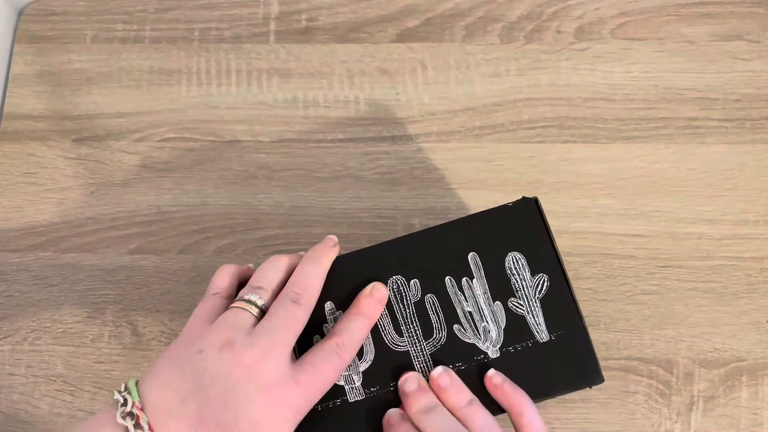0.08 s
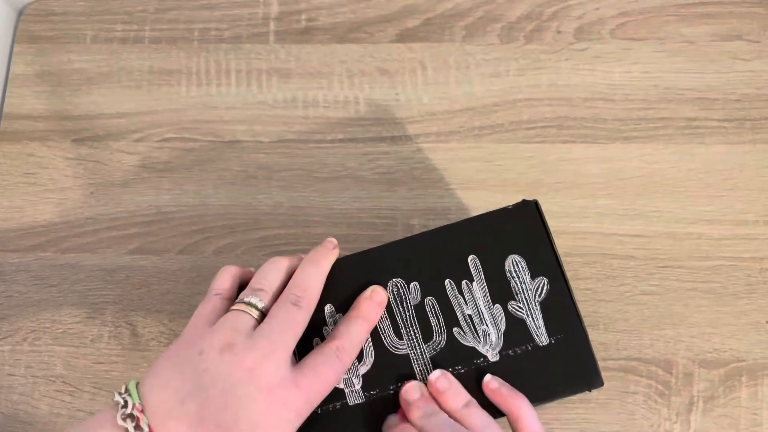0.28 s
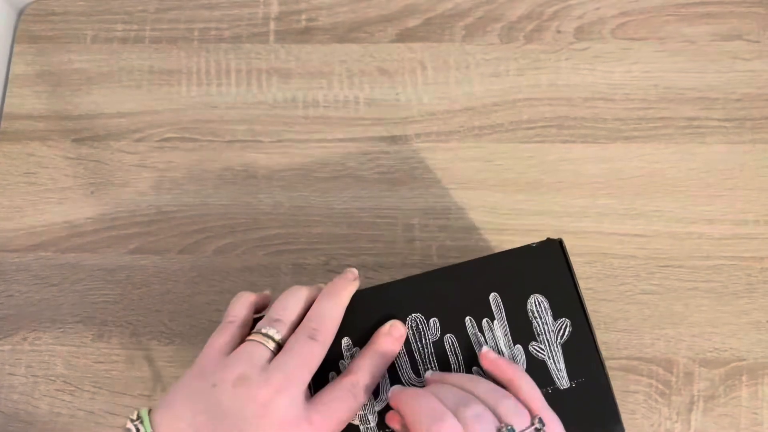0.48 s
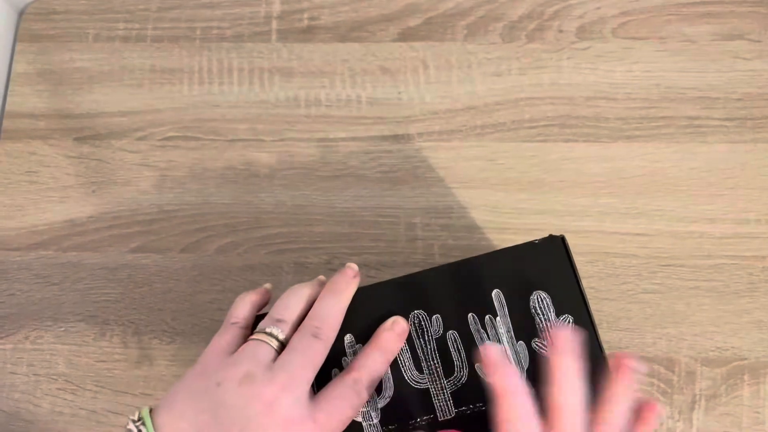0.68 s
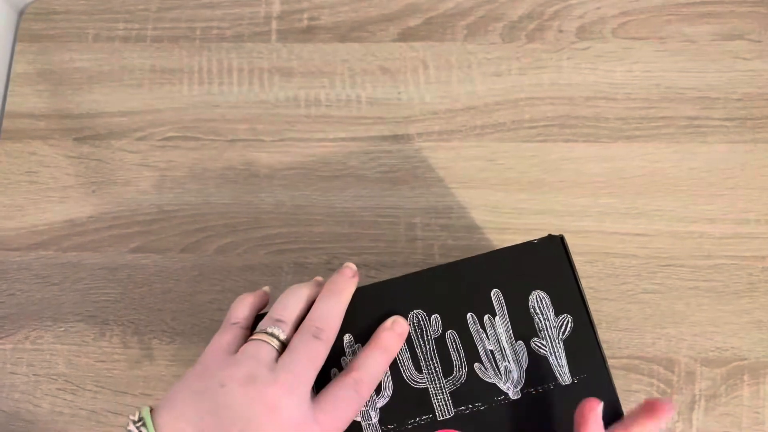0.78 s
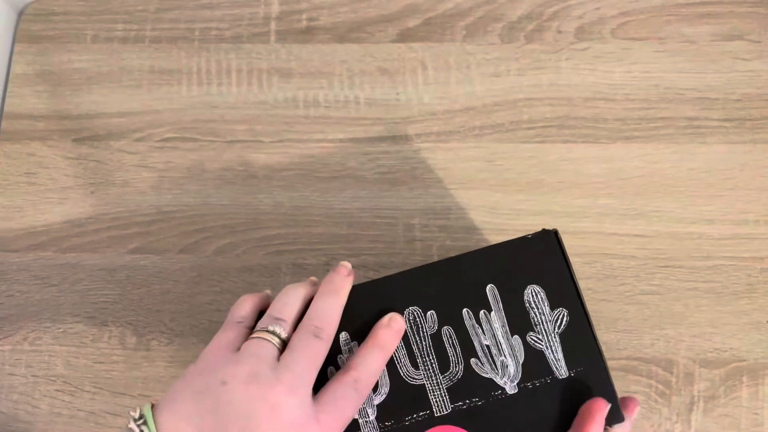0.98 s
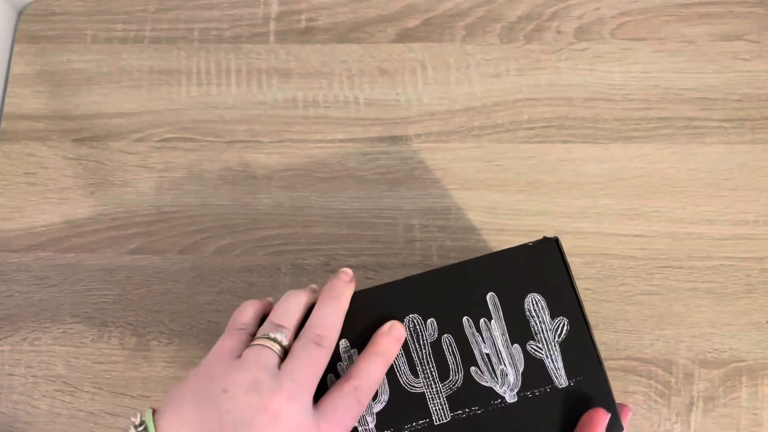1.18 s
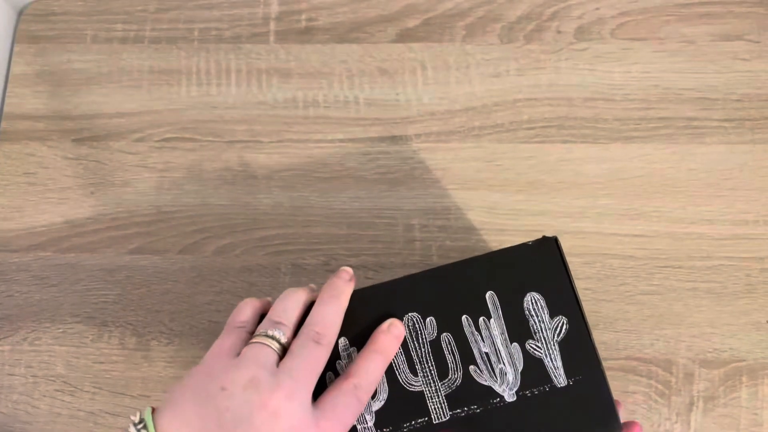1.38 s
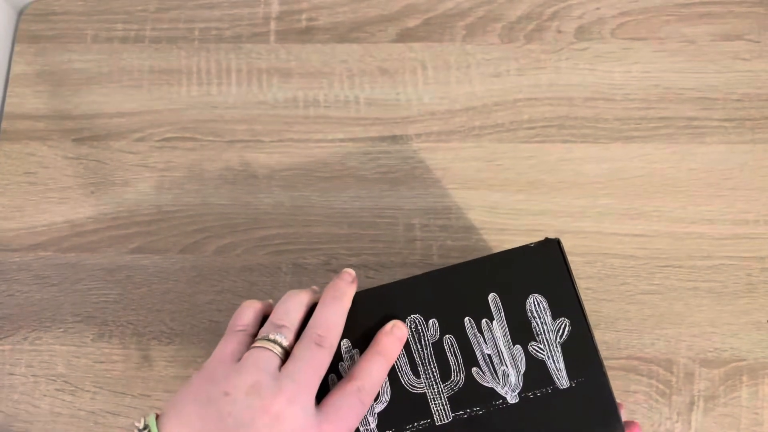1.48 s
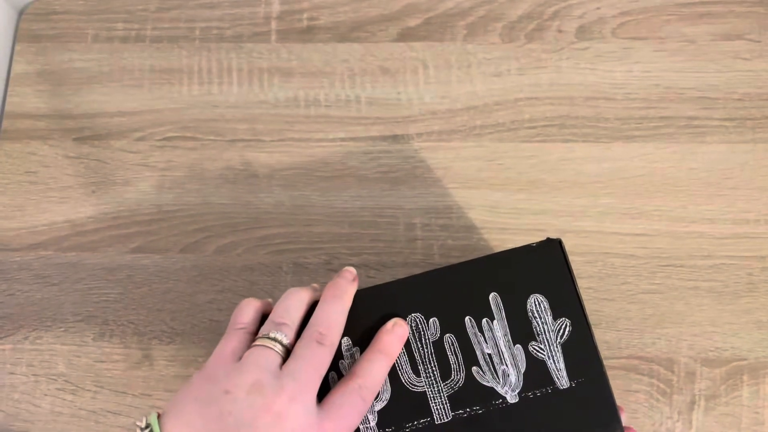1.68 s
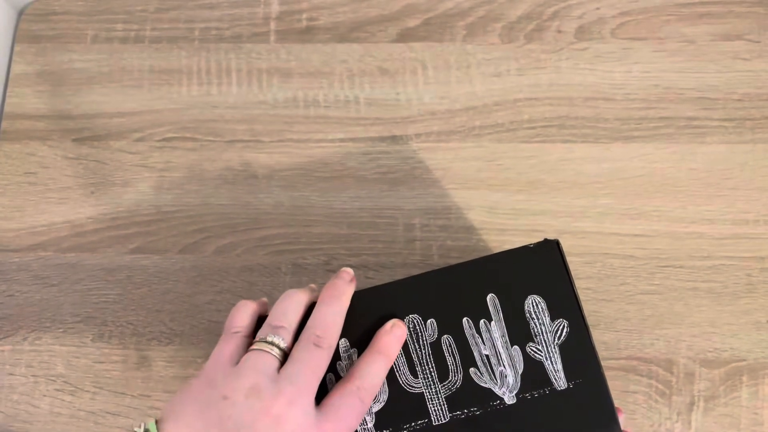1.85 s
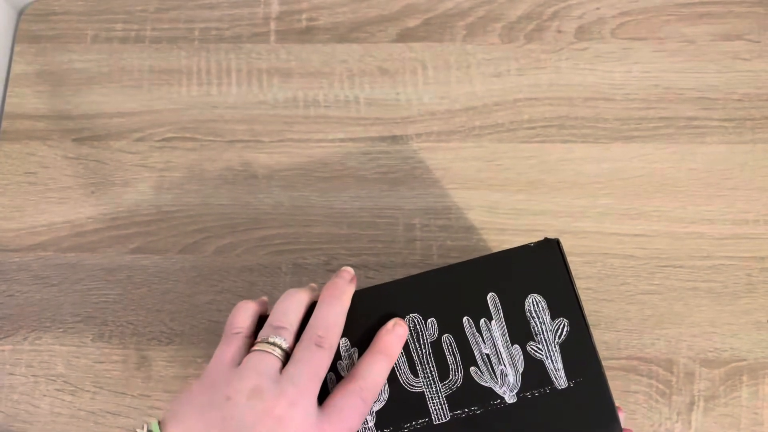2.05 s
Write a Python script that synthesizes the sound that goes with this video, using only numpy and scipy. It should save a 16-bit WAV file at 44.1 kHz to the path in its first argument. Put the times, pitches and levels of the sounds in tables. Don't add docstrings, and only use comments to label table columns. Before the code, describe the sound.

Fingernails pick and scratch at a sticker on a hollow cardboard box, with one early thump.

```python
import sys
import numpy as np
from scipy import signal
from scipy.fft import rfft, irfft, next_fast_len
from scipy.io import wavfile
from scipy.ndimage import uniform_filter1d, map_coordinates

SR = 44100
rng = np.random.default_rng(int(sys.argv[2]) if len(sys.argv) > 2 else 0)


def makeup_ratio(level_db):
    decades = np.asarray(level_db, float) / 20
    return 10 ** decades


def to_wav(sig):
    pcm = np.clip(np.atleast_2d(sig), -1, 1) * 32767
    pcm = np.round(pcm).astype(np.int16)
    wavfile.write(sys.argv[1], SR, pcm.T)


N = 92610
LEAD_S = 0.008


def unit(x):
    return x / np.sqrt(np.mean(x ** 2) + 1e-20)


def along(points, hz):
    point_hz, value = np.transpose(points)
    return np.interp(np.log(hz + 1), np.log(point_hz + 1), value)


def filtered(x, response):
    length = x.shape[-1]
    size = next_fast_len(length + 4096)
    spectrum = rfft(x, size) * response(np.fft.rfftfreq(size, 1 / SR))
    return irfft(spectrum, size)[..., :length]


def shaped_noise(curve):
    return unit(filtered(rng.standard_normal(N), lambda hz: makeup_ratio(along(curve, hz))))


def add(out, start_s, x):
    part = out[max(round(start_s * SR), 0):][:len(x)]
    part += x[:len(part)]


def ring(modes, swell_cycles, scatter_db):
    t = np.arange(SR // 3) / SR
    hz, level_db, t60_s = np.transpose(modes)[..., None]
    level_luck, pitch_luck = rng.standard_normal((2, 14, 1))[:, :len(modes)]
    decay = makeup_ratio(level_db + scatter_db * level_luck - 60 * t / t60_s)
    swell = (1 - np.exp(-t * hz / swell_cycles)) ** 2
    tone = np.sin(2 * np.pi * hz * t * (1 + scatter_db * 0.0082 * pitch_luck))
    return np.sum(decay * swell * tone, axis=0)


# centre_hz, width_hz, level_db
CARD = [(700, 530, -2), (1330, 330, 5), (2000, 320, 0), (2753, 285, -1.5), (3500, 770, -8), (4200, 340, -6),
        (5895, 880, -8), (12300, 2000, -17.5)]


def crack(tilt_db):
    t = np.arange(SR // 6) / SR
    attack_s, snap_t60_s, creak_t60_s = 0.00077, 0.014, 0.023
    tail_db, tail_t60_s = -26, 0.13
    creak_db, spike_db = -16, 18
    lag_s = 0.0009

    centre_hz = np.transpose(CARD)[0]
    tint = makeup_ratio(rng.normal(0, 2, len(CARD)) + tilt_db * np.log2(centre_hz / 1500))

    def wall(hz):
        total = 0
        for k, (centre, width, level_db) in enumerate(CARD):
            resonance = 1j * hz * width / (centre * centre - hz * hz + 1j * hz * width)
            total = total + (-1) ** k * tint[k] * makeup_ratio(level_db) * resonance
        return total

    def bend(hz):
        return np.exp(-2j * np.pi * lag_s * 1000 * np.log(1 + hz / 300))

    after = np.clip(t - LEAD_S, 0, None)
    snap = makeup_ratio(-60 * after / snap_t60_s) + makeup_ratio(tail_db - 60 * after / tail_t60_s)
    snap = snap * (1 - np.exp(-after / attack_s))
    creak = makeup_ratio(creak_db - 60 * np.abs(t - LEAD_S) / creak_t60_s)
    spike = makeup_ratio(spike_db) * (np.arange(len(t)) == round(LEAD_S * SR))
    burst = (snap + creak) * rng.standard_normal(len(t)) + spike
    x = filtered(burst, lambda hz: wall(hz) * bend(hz))
    return x / np.abs(x).max()


# start_s, crack_peak_db, box_ring_db, tilt_db_per_octave
PICKS = [(0.0085, -32.5, -43, 3.5), (0.0527, -51, -62, 0), (0.1264, -39, -49.5, 2),
         (0.1416, -45, -40.5, 1.5), (0.1512, -24, -43, 1.5), (0.1854, -14.5, -27, 5),
         (0.217, -30.5, -47, -2), (0.3684, -31.5, -65, 3), (0.6701, -41, -54.5, -0.5),
         (0.456, -34, -47, 21), (0.582, -39.5, -65, 7), (0.791, -35, -46.5, 3), (0.862, -55.5, -63.5, 6),
         (0.8845, -49, -53, -2), (0.9731, -41, -45, 0.5), (1.0084, -36, -57, 1.5), (1.04, -35.5, -47, 6.5),
         (1.0671, -56, -49, 7), (1.0979, -47.5, -49, -1.5), (1.12, -46.5, -45, 0),
         (1.1682, -42, -46.5, -3.5), (1.1832, -39.5, -43.5, -6.5), (1.26, -39, -46.5, -4.5),
         (1.2898, -72, -50, -2)]
# start_s, crack_peak_db, box_ring_db, tilt_db_per_octave
STUTTER = [(1.3365, -38.5, -42.5, -4), (1.3546, -45, -39, 4), (1.366, -38, -46, -4.5),
           (1.3776, -43, -38.5, -2), (1.3943, -32.5, -41.5, -5), (1.4139, -25.5, -35.5, -3),
           (1.4329, -25.5, -39.5, 0.5), (1.4586, -34.5, -36.5, 1), (1.491, -27, -36, -0.5),
           (1.5359, -44.5, -46.5, -14), (1.55, -32, -40, -3), (1.579, -37.5, -40, -4.5),
           (1.6011, -32.5, -36, -8), (1.7266, -44.5, -44, 3), (1.7438, -36.5, -47, -8.5),
           (1.7641, -43, -39, 3.5), (1.786, -42, -44.5, -10), (1.8644, -61, -56, 7), (1.915, -63, -71, 9),
           (1.922, -31, -47.5, -3.5)]
# pitch_hz, level_db, t60_s
BOX = [(156.8, -1, 0.087), (183.7, -2.5, 0.12), (217.6, -7.5, 0.12), (248.4, -13.5, 0.094),
       (300, -1.5, 0.12), (354.8, -0.5, 0.12), (428.8, -6.5, 0.071), (472, -3, 0.12), (506.4, -3, 0.067),
       (549, -6, 0.088), (625, -6, .08), (675.7, -7.5, 0.11), (781.3, -9, 0.13), (873, -24, 0.097)]


def nails():
    out = np.zeros(N)
    crack_trim_db, ring_trim_db = -2.5, -0.5
    for start_s, crack_db, ring_db, tilt_db in list(PICKS) + list(STUTTER):
        add(out, start_s - LEAD_S, makeup_ratio(crack_db + crack_trim_db) * crack(tilt_db))
        add(out, start_s, makeup_ratio(ring_db + ring_trim_db) * ring(BOX, swell_cycles=0.51, scatter_db=3.5))
    return out


# start_s, length_s, level_db, tilt_db_per_octave, squeak_hz
SLIDES = [(0.003, 0.0052, -52.5, 1.5, 3100), (0.142, 0.093, -48, -1, 3500), (0.178, 0.0079, -31, 2, 6840),
          (0.19, 0.11, -38, 0.5, 1566), (0.244, 0.059, -45.5, -5, 2080), (0.295, 0.026, -67.5, -11, 2540),
          (0.363, 0.061, -43.5, 0, 1590), (0.431, 0.025, -51, 1, 1420), (0.515, 0.069, -52, 4, 1500),
          (0.55, 0.012, -69.5, 7.5, 3085), (0.637, 0.013, -52, 6.5, 4200), (0.676, 0.034, -50.5, 3, 4370),
          (0.778, 0.016, -53, 0, 4090), (0.786, 0.0097, -46, -0.5, 4200), (0.85, 0.13, -71, 7.5, 2730),
          (0.808, 0.12, -72, -4.5, 2980), (0.961, 0.11, -63, 0.5, 3940), (1.069, 0.095, -67.5, 0, 4000),
          (1.123, 0.11, -62, 7, 6220), (1.261, 0.025, -62, -0.5, 2000), (1.335, 0.27, -68.5, 1.5, 2000)]
# freq_hz, level_db
PAPER = [(180, -18), (400, -5.5), (2000, -3), (3600, -10.5), (6300, -11), (9000, -5.5), (13000, -7),
         (16000, -19)]


def slides():
    out = np.zeros(N)
    t = np.arange(SR // 2) / SR
    attack_share, release_s = 0.3, 0.0072
    grit_db, sway_db = 0.5, 3.5
    squeak_db, squeak_q = 7, 11
    for start_s, length_s, level_db, tilt_db, squeak_hz in SLIDES:
        rise = np.clip(t / (attack_share * length_s), 0, 1)
        stroke = rise * np.exp(-np.clip(t - length_s, 0, None) / release_s)
        grit = unit(uniform_filter1d(rng.standard_normal(len(t)), size=60))
        sway = unit(uniform_filter1d(rng.standard_normal(len(t)), size=500))

        def colour(hz):
            paper = makeup_ratio(along(PAPER, hz) + tilt_db * np.log2(hz / 3000 + 0.0081))
            squeak = makeup_ratio(squeak_db) / (1 + (2 * squeak_q * (hz / squeak_hz - 1)) ** 2)
            return paper * (1 + squeak)

        hiss = filtered(makeup_ratio(grit_db * grit) * rng.standard_normal(len(t)), colour)
        add(out, start_s, makeup_ratio(level_db + sway_db * sway) * stroke * unit(hiss))
    return out


THUMP_HZ = [143, 166, 186, 296, 350, 471, 510, 620, 657, 694, 790, 1015]
# level_db, t60_s
THUMPED_BY = [(3.5, 0.084), (-2, 0.088), (-4, 0.078), (-9, 0.079), (-14.5, 0.12), (-17, 0.081),
              (-14.5, 0.057), (-21, 0.12), (-22, 0.063), (-19, 0.065), (-16.5, 0.088), (-16.5, .05)]


def flick():
    out = np.zeros(N)
    thump_s, rebound_s = 0.2409, 0.271
    lid = np.c_[THUMP_HZ, THUMPED_BY]
    add(out, thump_s, makeup_ratio(-1) * ring(lid, swell_cycles=1.4, scatter_db=0.5))
    add(out, rebound_s, makeup_ratio(-16.5) * ring(lid, swell_cycles=1.4, scatter_db=1.3))
    add(out, thump_s - LEAD_S, makeup_ratio(-6.5) * crack(tilt_db=-4))
    return out


# start_s, level_db, box_note_db
PALM = [(0.185, -30, -0.5), (0.218, -40, -14), (0.422, -42, 9.5), (0.434, -14, -19), (.465, -28.5, -1.5),
        (.487, -23, -11.5), (0.522, -32.5, -32), (0.539, -28.5, -60), (0.6, -47.5, -43.5),
        (0.631, -38.5, -48), (0.719, -48.5, -24), (0.798, -36, -25)]
# pitch_hz, level_db, t60_s
UNDER_PALM = [(62.5, -11, 0.084), (118, 2, 0.12), (144.3, 2.5, 0.11), (178.1, -5.5, .08),
              (194.2, -8, 0.084), (276, -19, 0.029), (346.5, 0, 0.083)]


def palm():
    out = np.zeros(N)
    *table, (box_hz, _, box_t60_s) = UNDER_PALM
    for start_s, level_db, box_db in PALM:
        modes = table + [(box_hz, box_db, box_t60_s)]
        add(out, start_s, makeup_ratio(level_db) * ring(modes, swell_cycles=0.67, scatter_db=0.0))
    return out


# time_s, level_db
TABLE = [(0.0, -53), (0.17, -75), (0.2, -40), (0.27, -26.5), (0.3, -46), (0.35, -34.5), (0.39, -51),
         (0.45, -32), (0.55, -34.5), (0.59, -49), (0.62, -42.5), (0.93, -63.5), (1.69, -69.5),
         (1.72, -65.5), (1.81, -57), (1.95, -70), (1.99, -58.5), (2.1, -66)]


def table_top():
    t = np.arange(N) / SR
    note_hz, wander_rad = 62.5, 1.8
    wander = map_coordinates(rng.standard_normal(30), [t * 8])
    swing = makeup_ratio(np.interp(t, *np.transpose(TABLE)))
    return swing * np.sqrt(2) * np.sin(2 * np.pi * note_hz * t + wander_rad * wander)


# freq_hz, level_db
HUM = [(15, -63), (25, -4), (64, 5), (108, -12), (163, -10), (220, -19.5), (290, -51.5), (480, -120)]
# freq_hz, level_db
AIR = [(59, -35.5), (100, -5.5), (155, 3.5), (297, -23), (718, -24.5), (867, -44.5), (983, -32),
       (15000, -65.5)]


def background():
    t = np.arange(N) / SR
    rumble = makeup_ratio(-64) * shaped_noise(HUM)
    air = makeup_ratio(-60) * shaped_noise(AIR)
    whine = makeup_ratio(-78) * np.sin(2 * np.pi * 856 * t)
    return rumble + air + whine


# freq_hz, t60_s
ROOM = [(200, 0.36), (1000, 0.18), (4000, 0.23), (12000, 0.2)]


def room(x, scale=1):
    delay_s = 0.004
    hz, t, noise = signal.stft(rng.standard_normal(SR // 2), SR, nperseg=128)
    decay = makeup_ratio(-60 * t / (scale * along(ROOM, hz)[:, None]))
    tail = signal.istft(noise * decay, SR, nperseg=128)[1]
    late = np.pad(x, (round(scale * delay_s * SR), 0))
    return signal.fftconvolve(late, tail / np.linalg.norm(tail))[:N]


# freq_hz, level_db
MIC = [(4000, 1.5), (7500, -6), (8600, -6.5), (9300, -7.5), (11000, -15.5), (11800, -10), (13000, -3.5)]
# freq_hz, level_db
THINNED = [(8300, 0), (8900, -22), (11200, -22), (11700, 0)]
# freq_hz, side_db
WIDTH = [(60, -37), (200, -26.5), (400, -13), (800, -6.5), (2000, -15), (5000, -7.5), (10000, -9),
         (13800, -8.5), (15300, -36.5)]


def ports(hits, heard):
    around = filtered(heard - hits, lambda hz: makeup_ratio(along(THINNED, hz)))
    mid = filtered(hits + around, lambda hz: makeup_ratio(along(MIC, hz)))
    loose_db, loose_size = -2.5, 0.15
    scattered = room(heard, loose_size) + room(heard, 2 * loose_size)

    def spread(hz):
        box_bulge = 0.1 * np.exp(-np.log(hz / 405.3 + 0.01) ** 2)
        return 1j * makeup_ratio(along(WIDTH, hz)) + box_bulge

    side = filtered(heard + makeup_ratio(loose_db) * scattered, spread)
    return np.array([mid + side, mid - side])


def scene():
    hits = nails() + flick() + palm()
    near = hits + slides()
    heard = near + makeup_ratio(-10) * room(near) + table_top() + background()
    return ports(hits, heard)


def top_cut(x):
    return signal.sosfilt(signal.butter(12, 16000, fs=SR, output="sos"), x)


def record(dry):
    low_hz, top_hz = 38, 15800

    def band(hz):
        return (1j * hz / (low_hz + 1j * hz)) ** 2 / (1 + (hz / top_hz) ** 80)

    return top_cut(filtered(dry, band))


dry = scene()
out = record(dry)
to_wav(out)
```